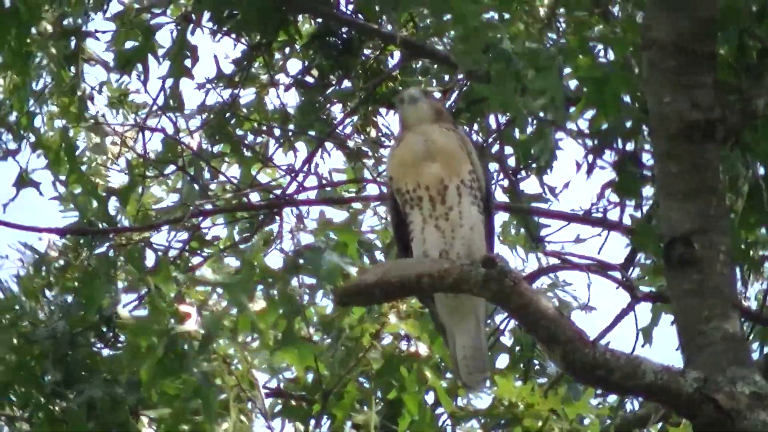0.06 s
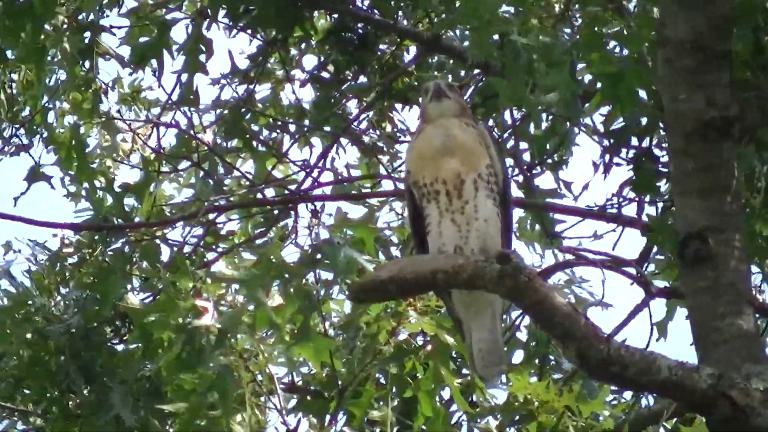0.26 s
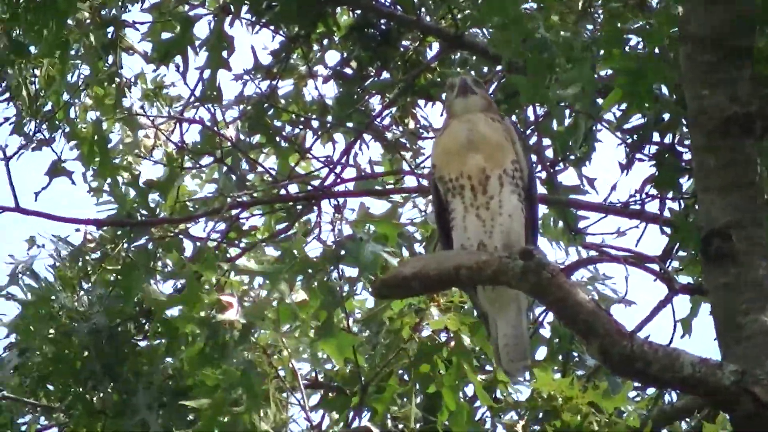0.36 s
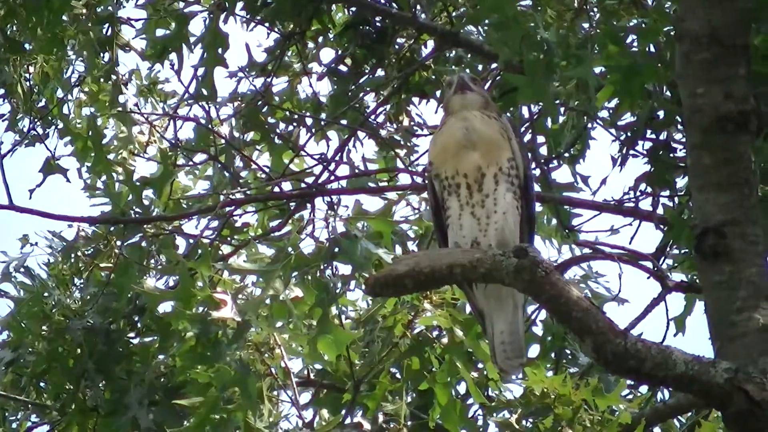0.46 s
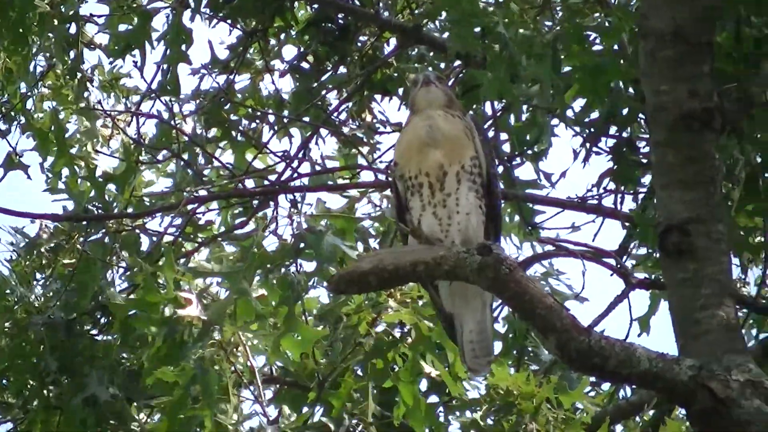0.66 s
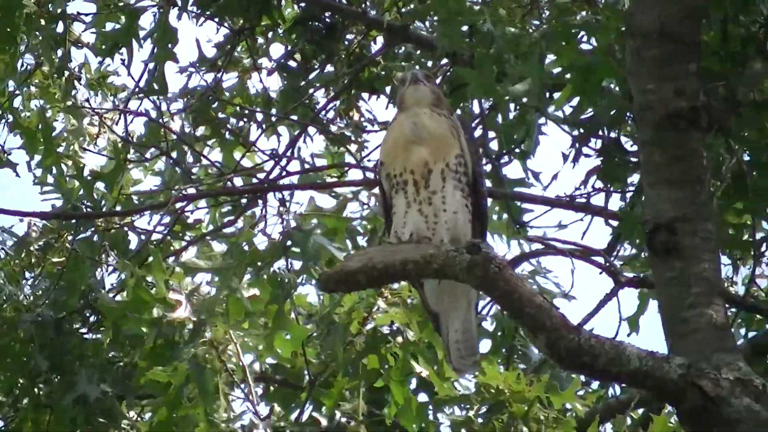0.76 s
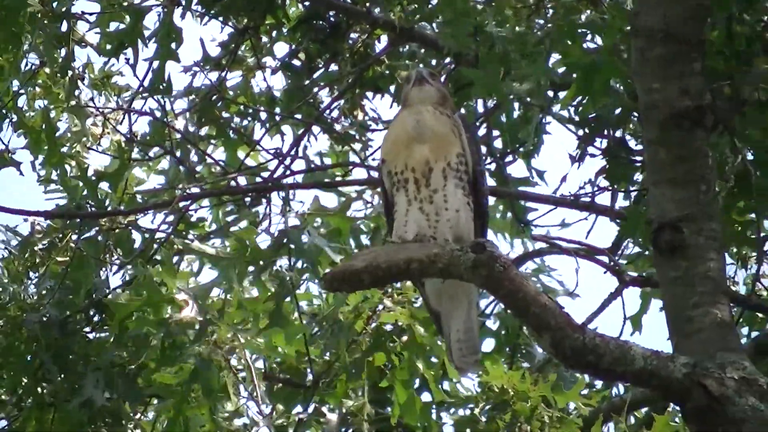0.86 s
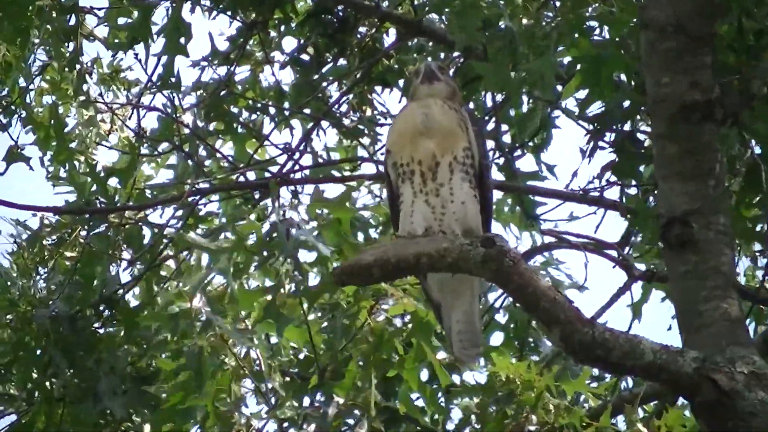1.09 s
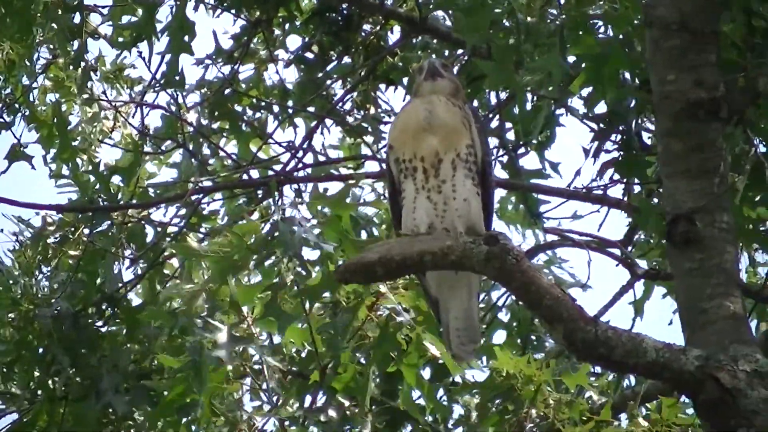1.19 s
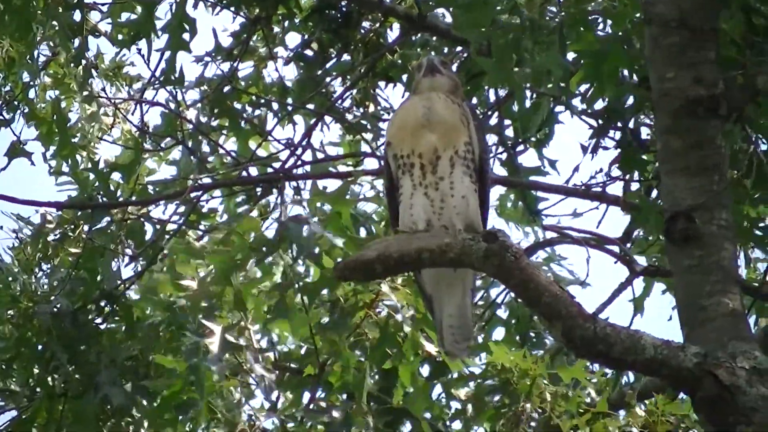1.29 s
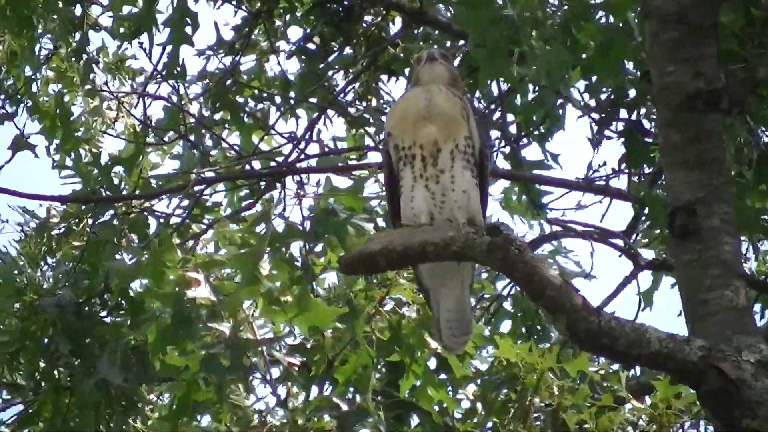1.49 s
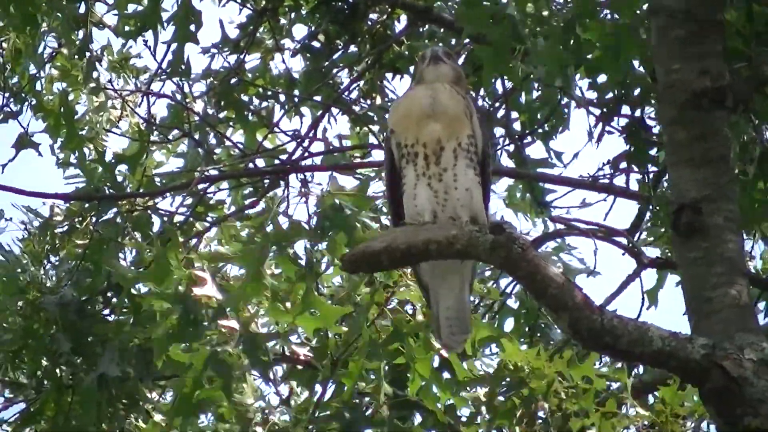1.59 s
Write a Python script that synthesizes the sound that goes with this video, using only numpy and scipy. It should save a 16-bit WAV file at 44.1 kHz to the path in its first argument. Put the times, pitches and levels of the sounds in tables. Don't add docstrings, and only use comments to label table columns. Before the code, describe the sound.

Two short, shrill hawk cries about three quarters of a second apart, slightly hoarse at their edges, ring briefly through the trees. A small sharp click ends the first; soft leaf hiss and low far traffic stay underneath.

```python
import sys
import numpy as np
from scipy import signal
from scipy.fft import rfft, irfft
from scipy.io import wavfile
from scipy.ndimage import uniform_filter1d

SR = 44100
rng = np.random.default_rng(int(sys.argv[2]) if len(sys.argv) > 2 else 0)


def level_to_linear(level):
    exponent = np.asarray(level, float) / 20
    return 10 ** exponent


def int16_out(signal):
    q = np.round(np.clip(np.atleast_2d(signal).T, -1, 1) * 32767)
    wavfile.write(sys.argv[1], SR, q.astype(np.int16))


N = 72765


def evened(x):
    return x / np.sqrt(np.mean(x ** 2) + 1e-20)


def read(points, hz):
    f, value = np.transpose(points)
    return np.interp(np.log(hz + 1), np.log(f + 1), value)


def add(mix, start_s, sound):
    part = mix[round(start_s * SR):][:len(sound)]
    part += sound[:len(part)]


def filtered(x, order, hz, kind="low"):
    return signal.sosfilt(signal.butter(order, hz, kind, fs=SR, output="sos"), x)


def resonate(x, hz, width_hz):
    turn = np.exp(2j * np.pi * np.cumsum(hz * np.ones(len(x))) / SR)
    r = np.exp(-np.pi * width_hz / SR)
    return 2 * (turn * signal.lfilter([1 - r], [1, -r], x / turn + 1e-18)).real


def traffic_and_leaves():
    # (frequency [Hz], density [dB per Hz])
    spectrum = [(30, -20), (100, -4.5), (270, -12), (650, -7.5), (1800, -17.5), (5000, -31), (10000, -44.5),
                (15500, -57.5)]
    # (frequency [Hz], left-right likeness [0-1])
    coherence = [(60, 1), (240, 0.9), (950, 0.96), (3770, 0.85), (15000, 1)]
    level_db, patch_db, swell_db = -48.5, 0.5, 0.93
    frames, hz = N // 256 + 5, np.fft.rfftfreq(1024, 1 / SR)
    a, b, c, d, patches = rng.standard_normal((5, 513, frames))
    patches = uniform_filter1d(patches, size=10, axis=0)
    patches = evened(uniform_filter1d(patches, size=12, axis=1))
    swell = evened(uniform_filter1d(rng.standard_normal(frames), size=30))
    same = np.clip(read(coherence, hz), 0, 1)[:, None]
    mid = np.sqrt((1 + same) / 2) * (a + 1j * b)
    side = np.sqrt((1 - same) / 2) * (c + 1j * d)
    shape_db = read(spectrum, hz)[:, None] + patch_db * patches + swell_db * swell
    z = np.array([mid + side, mid - side]) * level_to_linear(shape_db)
    return level_to_linear(level_db) * evened(signal.istft(z, nperseg=1024, noverlap=768)[1][:, :N])


def fuzzy_tone(hz, width_hz):
    steady = 0.55
    noise = evened(resonate(resonate(rng.standard_normal(N), hz, width_hz), hz, width_hz))
    sine = np.sqrt(2) * np.cos(2 * np.pi * hz * np.arange(N) / SR)
    return (1 - steady) * noise + steady * sine


def engine_drones():
    # (frequency [Hz], bandwidth [Hz], level [dB], start [s])
    engines = [
        (72.3, 2.6, -53, 1.2),
        (121.6, 12, -57, 0),
        (159.5, 28, -55, 0.146),
        (225, 39, -58, 0.079),
    ]
    t, out = np.arange(N) / SR, np.zeros(N)
    for hz, width_hz, db, start_s in engines:
        fade_in = np.clip((t - start_s) / 0.13 + 1, 0, 1)
        out += level_to_linear(db) * fade_in * fuzzy_tone(hz, width_hz)
    return out


def far_echoes():
    # (start [s], frequency [Hz], bandwidth [Hz], level [dB], t60 [s])
    lingering = [
        (0, 2478, 70, -51.5, 1.3),
        (0, 4940, 31, -67, 1),
        (0.576, 3179, 80, -38, 0.28),
        (1.345, 3190, 89.4, -44, 0.18),
        (1.46, 3238, 40, -61.5, 2.2),
        (.6, 2396, 90, -54.5, 0.7),
        (1.37, 2505, 120, -53, 0.93),
    ]
    # (start [s], end [s], frequency [Hz], level [dB])
    returned = [
        (.625, .665, 3130, -49),
        (.63, .68, 2480, -52),
        (1.375, 1.445, 3232, -46),
        (1.385, 1.445, 3146, -48.5),
    ]
    t, out = np.arange(N) / SR, np.zeros(N)
    for start_s, hz, width_hz, db, t60 in lingering:
        fade_in = np.clip((t - start_s) / 0.01 + 1, 0, 1)
        decay_db = 60 * np.maximum(t - start_s, 0) / t60
        out += fade_in * level_to_linear(db - decay_db) * fuzzy_tone(hz, width_hz)
    for start_s, end_s, hz, db in returned:
        fade_in = np.clip((t - start_s) / 0.023 + 1, 0, 1)
        decay_db = 400 * np.maximum(t - end_s, 0)
        out += fade_in * level_to_linear(db - decay_db) * fuzzy_tone(hz, 40)
    return out


def hawk_calls():
    # (time [s], pitch [Hz], level [dB], octave partial [dB], half-pitch partial [dB])
    rise_1, steady_1, closing_1 = [(0.211, 1600, -60, -82.5, -75.5), (0.218, 1892, -56.5, -80, -66.5),
                                   (.224, 1930, -47.5, -69, -47.5), (.237, 2140, -43.5, -53, -51.5),
                                   (0.244, 2237, -32.5, -44, -45.5), (0.253, 2250, -35, -38.5, -42.5),
                                   (.266, 2308, -31.5, -40.5, -52), (.284, 2334, -27, -33, -66.5),
                                   (.294, 2373, -28.5, -57, -70.5)], [(0.31, 2395, -25.5, -48.5, -71.5),
                                                   (.335, 2416, -24, -33, -75.5),
                                                   (.356, 2401, -25, -38, -70),
                                                   (0.375, 2402, -26, -37, -68),
                                                   (0.399, 2367, -26.5, -64, -72.5),
                                                   (.44, 2414, -23, -34, -63.5),
                                                   (.455, 2475, -25.5, -46, -60),
                                                   (0.465, 2515, -25, -36, -51.5),
                                                   (0.472, 2517, -33, -32, -62),
                                                   (0.483, 2575, -23, -37, -48.5),
                                                   (.486, 2600, -28.5, -46, -58)], [(0.561, 2472, -27.5, -58, -69),
                                                                  (0.57, 2322, -32.5, -47, -82.5),
                                                                  (.58, 2276, -35, -48.5, -53.5),
                                                                  (0.593, 2312, -38.5, -49.5, -46.5),
                                                                  (.603, 2050, -43.5, -70, -66.5)]
    rise_2, steady_2, closing_2 = [(.95, 1948, -68.5, -87.5, -63.5), (0.961, 2072, -50.5, -87.5, -59.5),
                                   (.967, 2160, -43, -74.5, -57), (0.974, 2267, -40.5, -52.5, -55.5),
                                   (.983, 2176, -40, -49, -46), (0.993, 2365, -35, -48, -45.5),
                                   (1.005, 2387, -29, -63, -51.5), (1.011, 2413, -30, -64.5, -58.5),
                                   (1.02, 2411, -27, -33, -60.5), (1.033, 2458, -28, -40.5, -67)], [(1.048, 2478, -28, -43, -67.5),
                                                   (1.078, 2489, -25, -36.5, -57.5),
                                                   (1.105, 2488, -24.5, -40.5, -60),
                                                   (1.129, 2470, -25, -54.5, -62),
                                                   (1.165, 2502, -25.5, -35.5, -60),
                                                   (1.178, 2529, -36, -31.5, -52),
                                                   (1.189, 2541, -25.5, -36, -59),
                                                   (1.198, 2606, -25.5, -47.5, -48.5),
                                                   (1.203, 2573, -21.5, -39, -50.5),
                                                   (1.214, 2667, -26.5, -48, -58.5),
                                                   (1.222, 2910, -36, -51, -64)], [(1.33, 2490, -48, -57, -66),
                                                                  (1.337, 2420, -29, -48.5, -71),
                                                                  (1.352, 2400, -34.5, -50.5, -51.5),
                                                                  (1.362, 2278, -43, -61, -58),
                                                                  (1.381, 2170, -70, -79, -64)]
    # (time [s], pitch [Hz], level [dB], octave partial [dB], second voice [dB])
    high_1, high_2 = [(0.484, 3107, -28, -41.5, -33), (.495, 3131, -32.5, -47.5, -37),
                      (0.526, 3148, -28.5, -45, -37.5), (0.54, 3046, -33.5, -47, -42),
                      (0.55, 3003, -35.5, -47.5, -41.5), (0.552, 3070, -22.5, -54.5, -37.5),
                      (0.561, 2944, -32, -56, -54), (0.572, 2990, -35.5, -65, -50.5)], [(1.218, 3260, -30, -51, -48), (1.227, 3228, -26, -49.5, -42.5),
                                      (1.252, 3241, -29.5, -52, -31.5), (1.274, 3220, -27.5, -49.5, -42.5),
                                      (1.292, 3216, -26, -43, -46.5), (1.307, 3180, -36, -56, -54.5),
                                      (1.317, 3097, -29, -44.5, -48), (1.3223, 3180, -41.5, -50, -48),
                                      (1.329, 2974, -28, -52, -43), (1.337, 3040, -42, -56, -43)]
    # (rough onset [s], rough ending [s], depth [0-1],
    # lowest line re half-pitch partial [dB])
    hoarseness = [
        (0.03, 0.0011, .3, -26),
        (0.00093, 0.0044, 0.3, -12),
        (0.055, 0.00067, 0.3, -8),
        (.001, 0.036, 0.4, -12),
    ]
    # (start [Hz], end [Hz], locked for [s], sum tone [dB])
    second_voices = [
        (2444, 2420, 0.039, -17),
        (2605, 2560, 0.04, -26),
    ]
    calls = np.zeros(N)
    low_notes = ([*rise_1, *steady_1], closing_1, [*rise_2, *steady_2], closing_2)
    for curve, hoarse in zip(low_notes, hoarseness):
        add(calls, *low_note(curve, *hoarse))
    for curve, second in zip((high_1, high_2), second_voices):
        add(calls, *high_note(curve, *second))
    return calls


def voicing(curve, onset_s=1e-3, ending_s=1e-3, depth=0):
    edge_s, jitter, hoarse_wobble, hiss_db, hiss_hz = 0.003, 0.0008, 0.04, -40, 500
    rows = np.array(curve, float)
    t = np.arange(rows[0, 0], rows[-1, 0], 1 / SR)
    hz, db, octave_db, other_db = (
        uniform_filter1d(np.interp(t, rows[:, 0], column), size=130, mode="nearest")
        for column in rows.T[1:])
    since, left = t - t[0], t[-1] - t
    near_end = np.minimum(since / onset_s, left / ending_s)
    rough = np.clip(depth, 0, 1) * np.clip(2 - 2 * near_end, 0, 1)
    noise = rng.standard_normal((2, 14000))
    wobble = evened(uniform_filter1d(uniform_filter1d(noise[0], size=150), size=100))[:len(t)]
    phase = 2 * np.pi * np.cumsum(hz * (1 + (jitter + hoarse_wobble * rough) * wobble)) / SR
    edge = np.sqrt(2) * np.clip(np.minimum(since, left) / edge_s, 0, 1)
    hiss = evened(resonate(resonate(noise[1, :len(t)], hz, hiss_hz), hz, hiss_hz))
    x = level_to_linear(db) * np.cos(phase) + level_to_linear(db + hiss_db) * hiss
    x += level_to_linear(octave_db) * np.cos(2 * phase + rng.uniform(0, 2 * np.pi))
    return t, phase, edge, db, other_db, x, rough, octave_db - db


def low_note(curve, onset_s, ending_s, depth, lowest_db):
    # (multiple of pitch, level re fundamental [dB], strongest after [s], fall [dB per s])
    upper = [(3, -22.5, 0.083, 59.5), (4, -54, 0.06, 247.5), (5, -47.5, .07, 302.5)]
    # (multiple of pitch, level re half-pitch partial [dB])
    halves = [(1.5, 2), (2.5, -11.5), (3.5, -23), (4.5, -47)]
    # (frequency [Hz], gain [dB])
    throat = [(5000, 4), (6200, -3), (7250, -0.5), (8050, -6), (8900, 7.5), (13000, -10.5)]
    beak_share, usual_octave_db = 0.34, -17
    flutter_hz, breath_db = 250, -8
    t, phase, edge, db, half_db, x, rough, beak_db = voicing(curve, onset_s, ending_s, depth)
    hz = np.gradient(phase) * SR / (2 * np.pi)

    def partial(k, level_db):
        gain = level_to_linear(level_db + read(throat, k * hz))
        return gain * np.cos(k * phase + rng.uniform(0, 2 * np.pi))

    opening_db = beak_share * (beak_db - usual_octave_db)
    for k, rel_db, peak_s, fall in upper:
        x = x + partial(k, db + rel_db + opening_db - fall * abs(t - t[0] - peak_s))
    for k, rel_db in [*halves, (0.46, lowest_db)]:
        x = x + partial(k, half_db + rel_db)
    noise = rng.standard_normal((2, 14000))[:, :len(t)]
    flutter = evened(filtered(noise[0], 4, flutter_hz))
    breath = evened(filtered(noise[1], 3, [1900, 4200], "band"))
    voice = x * (np.sqrt(1 - rough ** 2) + rough * flutter)
    return t[0], edge * (voice + rough * breath * level_to_linear(np.maximum(db, half_db) + breath_db))


def trees(x):
    # (onset [s], t60 [s], level [dB])
    scatterers = [
        (0.006, .2, -16),
        (0.038, 1.1, -25.5),
    ]
    # (frequency [Hz], gain [dB])
    colour = [(1500, -35), (2450, 1.5), (3200, 6.5), (5000, 2.5), (7500, 5.5), (12000, -32.5)]
    side_db, cell = -16, 20
    t, out = np.arange(SR) / SR, np.zeros((2, N))
    shape = (2, SR // cell - 1)
    for onset_s, t60, db in scatterers:
        taps = np.zeros((2, SR))
        places = np.arange(0, SR - cell, cell) + rng.integers(0, cell, shape)
        np.put_along_axis(taps, places, rng.choice([-1., 1.], shape), 1)
        taps = taps * np.clip(t / onset_s - 1, 0, 1) * level_to_linear(-60 * t / t60)
        taps = taps / np.linalg.norm(taps[0])
        out += level_to_linear(db) * signal.fftconvolve(x[None], taps, axes=1)[:, :N]
    mid, side = irfft(rfft(out) * level_to_linear(read(colour, np.fft.rfftfreq(N, 1 / SR))), N)
    return mid + np.array([[1], [-1]]) * level_to_linear(side_db) * side


def high_note(curve, start_hz, end_hz, lock_s, sum_db):
    # (multiple of pitch, level re fundamental [dB])
    partials = [(.5, -30), (1.5, -40), (2.5, -52), (3, -46)]
    # (lower edge [Hz], upper edge [Hz])
    rasp_band = [4300, 6100]
    grain_depth, grain_hz = 0.35, 70
    second_octave_db, difference_db, rasp_db = -20.5, -21, -32
    t, phase, edge, db, second_db, x, *_ = voicing(curve)
    second = 2 * np.pi * np.cumsum(np.linspace(start_hz, end_hz, len(t))) / SR
    grain = 1 + grain_depth * evened(filtered(rng.standard_normal(8000), 2, grain_hz))[:len(t)]
    for k, rel_db in partials:
        x = x + level_to_linear(db + rel_db) * np.cos(k * phase)
    second_voice = np.cos(second) + level_to_linear(second_octave_db) * np.cos(2 * second)
    x = x + grain * level_to_linear(second_db) * second_voice
    mixed = level_to_linear(sum_db) * np.cos(phase + second) + level_to_linear(difference_db) * np.cos(2 * phase - second)
    unlocked_db = 230 * np.maximum(t - t[0] - lock_s, 0)
    x = x + (1 + grain) / 2 * level_to_linear(db - unlocked_db) * mixed
    rasp = evened(filtered(rng.standard_normal(8000), 4, rasp_band, "band"))[:len(t)]
    return t[0], edge * (x + level_to_linear(db + rasp_db) * rasp)


def twig_clicks():
    # (time [s], peak level [dB], t60 [s], brightness [dB per octave])
    cracks = [
        (0.5925, -23.5, 0.022, 0),
        (1.5268, -41, 0.004, 3),
    ]
    # (frequency [Hz], bandwidth [Hz], level [dB])
    modes = [(433, 380, -9), (1026, 640, -4), (1740, 1000, -1), (2600, 370, 0), (3460, 1010, -8),
             (5740, 1040, -15), (8100, 1300, -30)]
    snap_db, top_hz = 8, 9500
    t, out = np.arange(2000) / SR, np.zeros(N)
    for start_s, db, t60, bright_db in cracks:
        burst = rng.standard_normal(2000) * level_to_linear(-60 * t / t60) + level_to_linear(snap_db) * (t == 0)
        x = np.zeros(2000)
        for hz, width_hz, mode_db in modes:
            ring = burst
            for _ in range(3):
                ring = resonate(ring, hz, width_hz)
            x += evened(ring) * level_to_linear(mode_db + bright_db * np.log2(hz / 2000))
        x = filtered(x, 4, top_hz)
        add(out, start_s, level_to_linear(db) * x / abs(x).max())
    return out


def scene():
    background = traffic_and_leaves() + engine_drones() + far_echoes()
    near = hawk_calls() + twig_clicks()
    near_pan, background_pan = level_to_linear([[0.64], [-0.64]]), level_to_linear([[0.2], [-0.2]])
    return (near + trees(near)) * near_pan + background * background_pan


def low_pass(x):
    return signal.sosfilt(signal.butter(12, 15650, fs=SR, output="sos"), x)


def record(dry):
    mix = filtered(dry, 3, 45.7, "high")
    return low_pass(mix)


dry = scene()
out = record(dry)
int16_out(out)
```